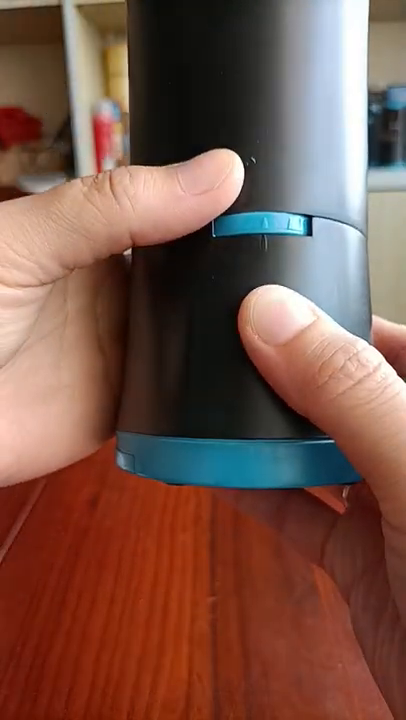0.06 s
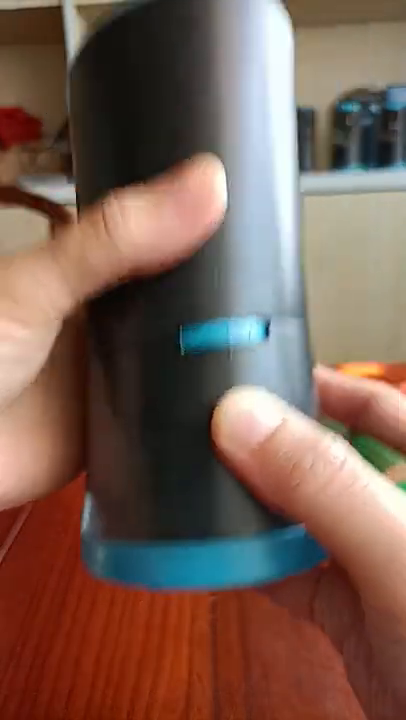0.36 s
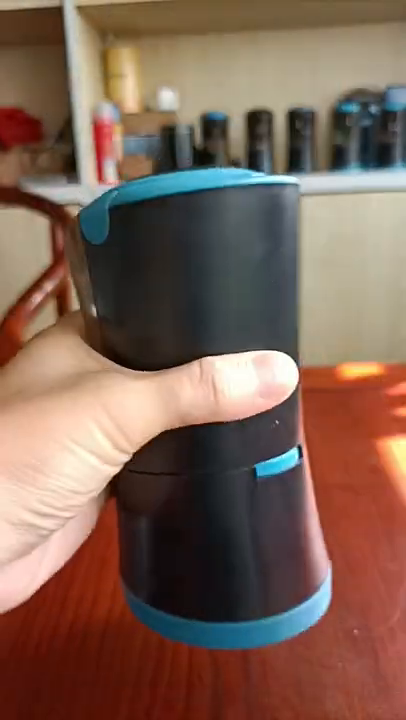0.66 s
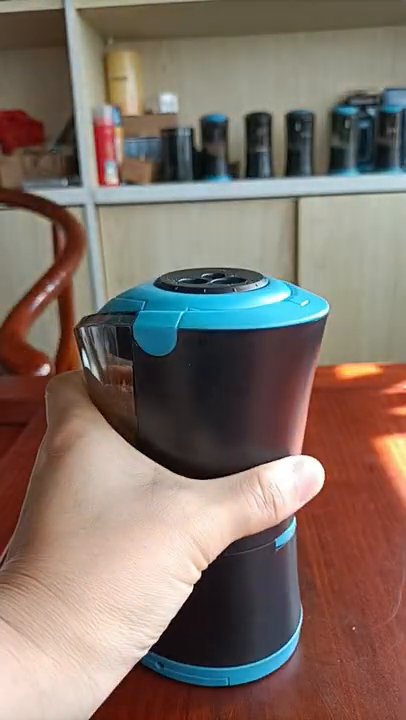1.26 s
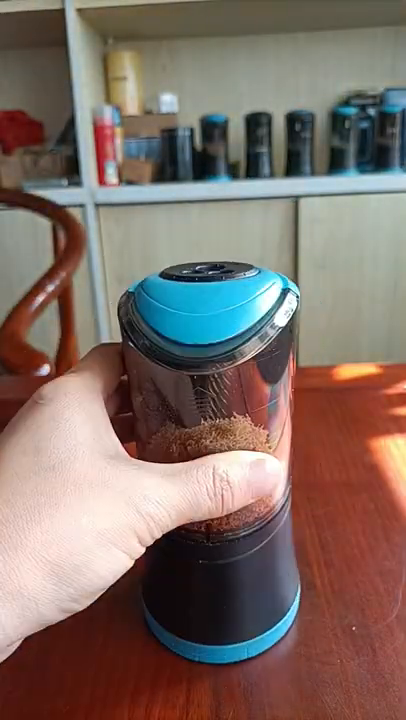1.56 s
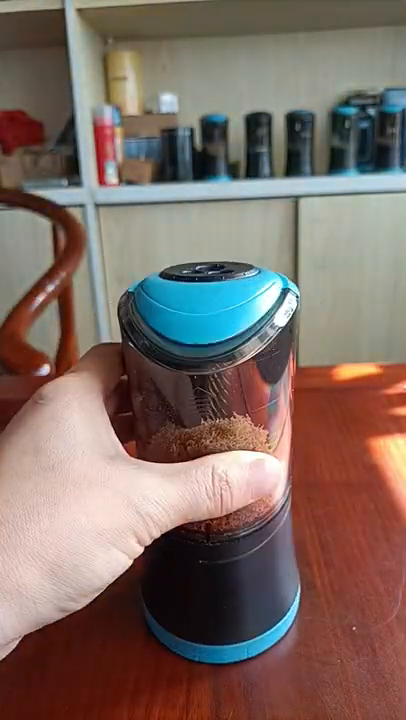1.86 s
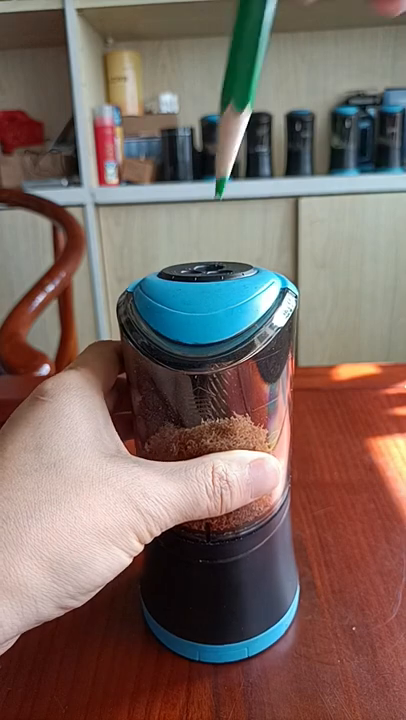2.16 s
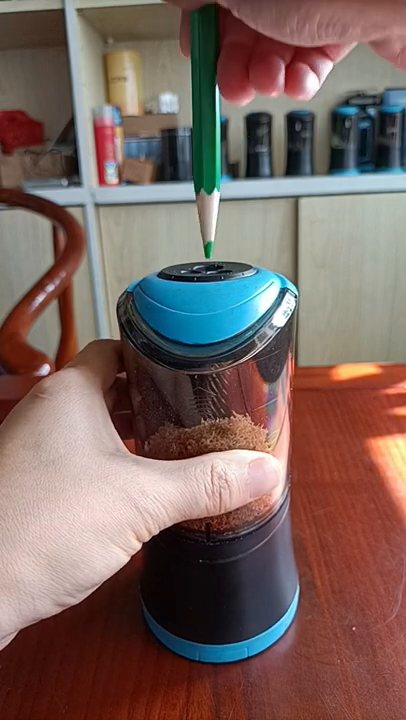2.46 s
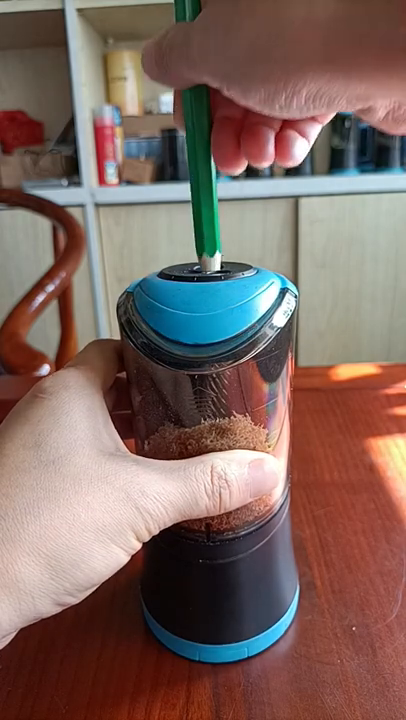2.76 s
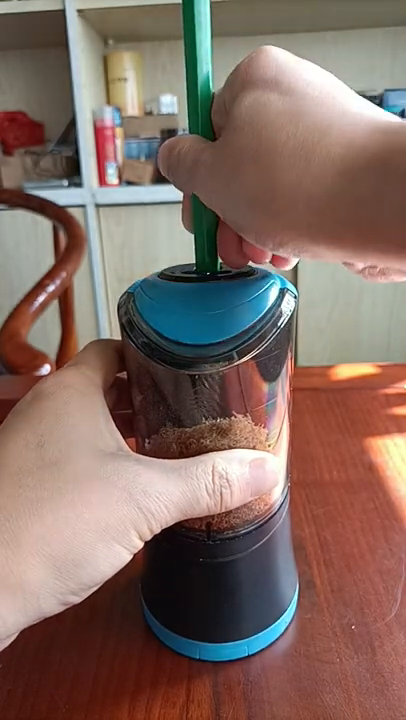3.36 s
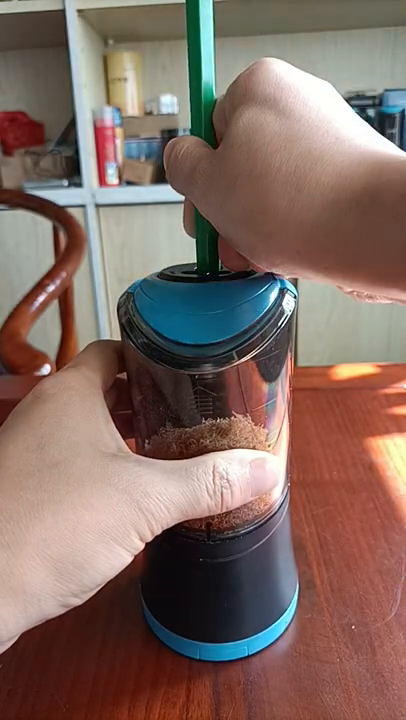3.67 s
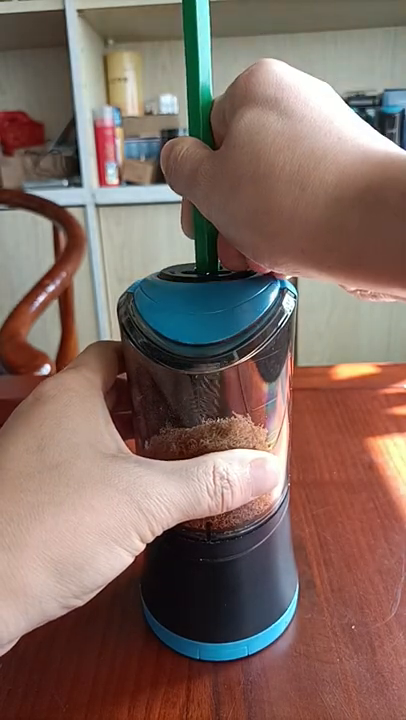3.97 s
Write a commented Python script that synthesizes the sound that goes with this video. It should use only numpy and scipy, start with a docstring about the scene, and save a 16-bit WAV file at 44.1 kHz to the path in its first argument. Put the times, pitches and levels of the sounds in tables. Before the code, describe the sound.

Close by in a small quiet room, faint handling of plastic leads to a thump on a wooden table and a soft pencil swish. Then the main sound: an electric pencil sharpener spins up, whining, rasping and crackling through wood.

```python
"""A quiet room with a wooden table: hands turn a battery pencil sharpener and stand it down with a thump.
A pencil swishes off the table, taps the lid and slides in. The motor spins up, its gears whine through
the plastic housing, and the speed sags and wavers as the cutter bites into the wood, scraping,
splintering and shaking the table top."""
import sys
import numpy as np
from scipy import signal
from scipy.fft import rfft, irfft
from scipy.io import wavfile
from scipy.ndimage import uniform_filter1d

SR = 44100
rng = np.random.default_rng(int(sys.argv[2]) if len(sys.argv) > 2 else 0)


def file_out(sig):
    """Save sig as 16-bit WAV at sys.argv[1]."""
    # one column per channel
    cols = np.atleast_2d(sig).T
    # limit, then scale
    lim = np.clip(cols, -1, 1)
    pcm = np.round(lim * 32767).astype(np.int16)
    wavfile.write(sys.argv[1], SR, pcm)


N = 176400
T = np.arange(N) / SR
FREQS = np.fft.rfftfreq(N, 1 / SR)

# gear-mesh rate, following the motor speed: time_s, rate_hz
MESH_RATE = [(3.07, 759.6), (3.08, 807), (3.098, 1069), (3.116, 1204), (3.138, 1286), (3.162, 1319),
             (3.204, 1187), (3.26, 1127), (3.322, 1022), (3.354, 1114), (3.374, 1208), (3.45, 900.4),
             (3.488, 825.4), (3.54, 854.6), (3.602, 800.4), (3.66, 787.5), (3.715, 877), (3.745, 817),
             (3.77, 731), (3.785, 716.2), (3.804, 764), (3.87, 874.4), (3.9, 842.5), (3.944, 748.2),
             (3.976, 803), (4.0, 744)]
# tone of wood scraping inside the sharpener: freq_hz, left_db, right_db
SCRAPE_EQ = [(100, -19, -28), (550, -1, -11), (990, -1, -0.5), (1770, 7, 1), (2220, 8, 7), (3000, 2, 4.5),
             (4380, 1.5, -4.5), (5970, -1.5, -0.5), (6400, 4, 0.5), (7170, 5, -9), (7680, -16, -0.5),
             (8200, -5, 8), (8560, -7, 1), (8920, -5.5, 5), (9640, -3, -4), (9960, 2.5, 6.5),
             (11150, -6.5, -3.5), (12740, -5.5, -9.5), (14600, -15, -47)]


def amp(db):
    """Decibels to gain."""
    return 10 ** (np.asarray(db) / 20)


def unit(x):
    """Scales to rms 1."""
    return x / np.sqrt(np.mean(x ** 2) + 1e-20)


def ear_gains(eq, hz):
    """Left and right gain of an EQ curve at hz."""
    freqs, left, right = np.transpose(eq)
    return amp([np.interp(np.log(hz + 1), np.log(freqs), db) for db in (left, right)])


def fader(table, column=1):
    """Gain over time from one dB column, silent outside its span."""
    rows = np.array(table)
    return amp(np.interp(T, rows[:, 0], rows[:, column], left=-np.inf, right=-np.inf))


def colour(x, eq):
    """Shapes a signal with each ear's EQ curve, at rms 1."""
    return unit(irfft(rfft(x) * ear_gains(eq, FREQS), N))


def noise(shared):
    """Stereo white noise with a fraction of its power common to both ears."""
    return np.sqrt(shared) * rng.standard_normal(N) + np.sqrt(1 - shared) * rng.standard_normal((2, N))


def drift(hz):
    """Random wavering up to about hz, at rms 1."""
    return unit(irfft(rfft(rng.standard_normal(N)) / (1 + (FREQS / hz) ** 4), N))


def decay(start, t60):
    """Sudden start, exponential fall."""
    return (T >= start) * np.exp(-np.log(1000) * np.maximum(T - start, 0) / t60)


def ring(x, modes):
    """Plays x through a set of dying modes."""
    t = T[:SR // 3]
    response = sum(amp(db - 60 * t / t60) * np.sin(2 * np.pi * hz * t) for hz, db, t60 in modes)
    return signal.oaconvolve(x, response)[:N]


def echoes(x, t60, per_s=2000):
    """A short tail of sparse reflections, different for each ear."""
    size = SR // 2
    taps = rng.choice([-1., 1.], (2, size)) * (rng.random((2, size)) < per_s / SR)
    taps *= decay(.002, t60)[:size]
    return signal.fftconvolve(x, taps / np.linalg.norm(taps, axis=1, keepdims=True), axes=1)[:, :N]


def gears(teeth=9, jitter=0.006, rough_hz=170):
    """Rough harmonics of the tooth rate flare as they glide through the housing's resonances."""
    # how the housing radiates the whine: freq_hz, left_db, right_db
    housing_eq = [(720, -27, -33), (830, -26, -30), (900, -27, -32), (1100, -42, -39), (1300, -35, -33),
                  (1490, -38, -47), (1590, -21, -34), (1740, -18, -30), (1810, -28, -38), (2050, -18, -25),
                  (2200, -12, -20), (2330, -12, -20), (2410, -18, -25), (2510, -26, -29), (2620, -25, -24),
                  (2830, -27, -15), (3000, -30, -31), (3080, -26, -29), (3200, -35, -40), (3330, -29, -35),
                  (3470, -42, -46), (3720, -24, -30), (3950, -33, -38), (4130, -34, -38), (4400, -44, -47),
                  (4700, -30, -36), (5100, -33, -37), (5600, -36, -40), (6800, -36, -46), (7500, -50, -50),
                  (8200, -50, -34), (9500, -46, -41), (11000, -43, -45)]
    # gear harmonics: multiple, level_db
    harmonics = [(1, 0.5), (2, 1.85), (3, 3), (4, -1), (5, -5.5), (6, -1.5), (7, -4)]
    # swell of the whine: time_s, level_db
    swell = [(3.052, -22), (3.085, -2), (3.14, 1.5), (3.19, 1.5), (3.26, 1), (3.39, 2.5), (3.43, 1),
             (3.52, -0.5), (3.64, 0), (3.72, 2), (3.785, -3), (3.86, 2), (4.0, 0)]
    # phase between the ears: freq_hz, left_lead_rad
    ear_phase = [(700, -0.9), (1650, -1.88), (2150, -2.5), (2350, -3), (2580, -5), (3100, -4.5),
                 (3880, -6.5), (7000, -13.5)]
    hz = np.interp(T, *np.transpose(MESH_RATE))
    phase = 2 * np.pi * np.cumsum(hz * (1 + jitter * drift(rough_hz))) / SR
    whine = np.zeros((2, N))
    for k, db in harmonics:
        shaft_wobble = 0.2 * np.sin(phase / teeth + k)
        contact = 1 + 0.2 * drift(rough_hz) + shaft_wobble
        if k == 1:
            contact += 0.53 * drift(35.7)  # the fundamental flutters
        smear = 0.016 * k ** 2 * drift(rough_hz)  # upper harmonics blur most
        ears = np.outer([0, -1], np.interp(k * hz, *np.transpose(ear_phase)))
        tone = np.sin(k * phase + ears + smear + 2 * np.pi * rng.random())
        whine += amp(db) * ear_gains(housing_eq, k * hz) * contact * tone
    return amp(-1.7) * np.sqrt(2) * whine * fader(swell)


def wood_grain(teeth_passed, chips_per_s=1300):
    """Hiss and tiny chips of cut wood echo in the case and rasp in time with the gear teeth."""
    chips = (rng.random(N) < chips_per_s / SR) * rng.choice([-1, 1], N)
    chips = chips * amp(-np.minimum(rng.exponential(1, N), 4))
    grain = unit(noise(shared=0.21) + amp(-6) * unit(chips))
    grain += amp(-3) * echoes(grain, t60=0.043)
    rasp = 1 + 0.22 * np.cos(2 * np.pi * teeth_passed)
    return grain * rasp * amp(1.1 * drift(220))


def cutter(teeth_per_blade=18):
    """Blades scrape the wood and catch now and then; their steady strikes shake the table."""
    # bite of the blades: time_s, scrape_db, rumble_db
    bite = [(3.055, -32, -46), (3.063, -38, -42), (3.074, -31, -37.5), (3.103, -25.5, -31),
            (3.16, -20.5, -29), (3.177, -24.5, -32.5), (3.345, -27, -30), (3.367, -25, -29.5),
            (3.507, -30.5, -33), (3.519, -28.5, -28.5), (3.659, -31, -35.5), (3.677, -28.5, -30.5),
            (3.803, -32, -33.5), (3.867, -28.5, -26.5), (3.887, -30, -36.5), (4.0, -30, -33.5)]
    # modes of the table top: pitch_hz, level_db, t60_s
    table_modes = [(195, -3.5, 0.12), (291, 3.5, 0.12)]
    # low rumble of the cut: freq_hz, left_db, right_db
    rumble_eq = [(20, -45, -45), (45, -40, -43), (102, -15, -18), (200, -1, -8), (291, 2, 0.5),
                 (433, -9, -12.5), (646, -15.5, -15.5), (2000, -61, -57), (16000, -90, -90)]
    teeth_passed = np.cumsum(np.interp(T, *np.transpose(MESH_RATE))) / SR
    grain = wood_grain(teeth_passed)
    scrape = amp(5.5) * fader(bite) * colour(grain, SCRAPE_EQ)
    strikes = np.diff(np.floor(teeth_passed / teeth_per_blade), prepend=0) * amp(2.5 * drift(150))
    shake = amp(-9.5) * unit(ring(strikes, table_modes)) * amp([[2], [-1.5]])
    rumble = amp(-0.5) * colour(noise(shared=0.96), rumble_eq)
    return scrape + fader(bite, column=2) * (shake + rumble) + catches(grain)


def catches(grain, split_delay_s=0.0012):
    """A blade snags with a knock, and the wood splinters just after."""
    # snags of the cutter: start_s, knock_db, splinter_db
    snags = [(3.053, -29, -40), (3.072, -31, -37), (3.133, -13.5, -15), (3.158, -31, -14.5),
             (3.206, -36, -27), (3.358, -23.5, -20), (3.438, -18.5, -34), (3.678, -23, -47)]
    # body of the knock: freq_hz, left_db, right_db
    knock_eq = [(20, -37, -40), (70, -23, -19), (250, 3, -3), (563, 4.5, -9), (905, 14, 10.5),
                (1490, 4, -11), (3000, -7, -8), (11000, -22, -11), (15000, -30, -40)]
    # bright crack of splitting wood: freq_hz, left_db, right_db
    splinter_eq = [(2000, -31, -36), (6500, -15, -16), (8000, -8, 16), (10400, -6, -2), (14800, -16, -26)]
    knocks = sum(amp(db) * decay(start, t60=0.03) for start, db, _ in snags)
    splinters = sum(amp(db) * decay(start + split_delay_s, t60=0.044) for start, _, db in snags)
    return knocks * colour(noise(shared=0.8), knock_eq) + splinters * colour(grain, splinter_eq)


def thumps(rise_s=0.00414, overtone_ratio=1.64):
    """The table top rings low and briefly under the base, with one overtone."""
    # the base meets the table: start_s, level_db, pitch_hz, t60_s
    landings = [(0.663, -34.5, 66, 0.18), (1.313, -18.5, 167.7, 0.068), (1.351, -33, 175, 0.07),
                (1.4831, -6.5, 200, 0.061), (1.4949, -4, 187.6, 0.038), (1.511, -13, 220, 0.047),
                (3.162, -15, 178, 0.072), (3.198, -16.5, 195, 0.12), (3.53, -17.5, 238, 0.03),
                (3.676, -10, 200, 0.025)]
    wood = np.zeros(N)
    for start, db, hz, t60 in landings:
        age = np.maximum(T - start, 0)
        phase = 2 * np.pi * hz * age
        tone = np.sin(phase) + amp(-17.5) * np.sin(overtone_ratio * phase)
        wood -= amp(db) * np.minimum(age / rise_s, 1) * decay(start, t60) * tone
    return wood * amp([[2], [-1.5]])  # left of centre


def contacts():
    """Each touch is a short burst; the stiff shell rings only faintly after it."""
    # light plastic and pencil touches: start_s, level_db, t60_s, pan_left_db
    ticks = [(0.444, -49.5, 0.1, -3), (0.511, -54, 0.053, 10), (0.6635, -39, 0.042, 1),
             (1.322, -60, 0.061, 2), (1.487, -25.5, 0.017, -7), (1.496, -39.5, 0.098, -6),
             (1.853, -52, 0.23, -3), (2.123, -43.5, 0.02, -9), (2.864, -54, 0.15, -3),
             (3.0547, -23.5, 0.023, 0)]
    # tone of a touch: freq_hz, left_db, right_db
    tick_eq = [(100, -18, -19), (815, 11, 7), (2750, 12, 0), (5330, 2.5, -3), (6500, 11, -26),
               (7700, -2, 0), (10200, -9, 0.5), (12400, -5, -15), (16000, -15, -31)]
    # modes of the plastic shell: pitch_hz, level_db, t60_s
    shell_modes = [(2570, 1, 0.091), (2943, -2, 0.15), (5130, -22, 0.083), (6200, -12, .11),
                   (7900, -6, 0.11)]
    bursts, hits = np.zeros((2, N)), np.zeros(N)
    for start, db, t60, pan in ticks:
        bursts += amp([[db + pan / 2], [db - pan / 2]]) * decay(start, t60)
        hits[round(start * SR)] = amp(min(db, -42))
    return bursts * colour(noise(shared=0.26), tick_eq) + amp(-6) * ring(hits, shell_modes)


def lid_tap(start_s=2.864):
    """The pencil point meets the rim of the opening and the thin lid rings."""
    # modes of the lid: pitch_hz, level_db, t60_s
    lid_modes = [(2433, -2, .24), (3144, -3, .15), (5211, -6, .15), (6040, -8, .15)]
    hit = np.zeros(N)
    hit[round(start_s * SR)] = 1
    return np.outer(amp([-49, -53]), ring(hit, lid_modes))


def hand_grip():
    """Skin slides on the shell with a flickering hiss over a low rub."""
    # movement of the hand: time_s, hiss_db, rub_db
    grip = [(0.3, -93, -47), (0.34, -74, -53), (0.394, -54.5, -44), (0.432, -50, -47.5), (0.486, -58, -50),
            (0.536, -48.5, -49.5), (0.585, -52, -53), (0.634, -57, -57), (0.662, -52, -48),
            (0.71, -59, -44), (0.82, -66.5, -61.5), (1.0, -76, -51.5)]
    # hiss of skin on plastic: freq_hz, left_db, right_db
    skin_eq = [(200, -15, -4), (1490, -6, -3.5), (4970, -9, -7.5), (6980, 8.5, -6), (7900, -12, 2.5),
               (9900, 0, -2.5), (12500, -4.5, -7), (15200, 6, -21)]
    # low rub of the hand: freq_hz, left_db, right_db
    rub_eq = [(20, -31, -31), (55.7, -3, -4), (86, -29, -30), (300, -27.5, -28), (1000, -64, -63)]
    hiss = amp(5 + drift(80)) * fader(grip) * colour(noise(shared=0.17), skin_eq)
    rub = amp(2) * fader(grip, column=2) * colour(noise(shared=1), rub_eq)
    return hiss + rub


def pencil_slide(width_hz=610):
    """The pencil swishes over the table with a falling resonance and rings as it leaves the wood."""
    # the stroke: time_s, swish_db, resonance_db, resonance_hz
    stroke = [(1.65, -83, -84, 4600), (1.8, -66, -81.5, 4680), (1.88, -57.5, -58.5, 4690),
              (2.0, -57, -55, 4550), (2.07, -54, -56, 3930), (2.12, -63, -79, 3500),
              (2.199, -62.5, -83, 3000), (2.36, -80, -88, 3000)]
    # friction of pencil on table: freq_hz, left_db, right_db
    swish_eq = [(300, -7, -11), (2000, -1, 0), (2750, 5, 5), (3560, -1, -5), (5500, -4, -6),
                (6200, 9.5, -6), (6840, 11.5, -2), (7650, -11, -9), (8140, -19, 3), (9200, -9, -7),
                (12500, -8, -8), (15300, -3, -21)]
    # swell of the parting ring: time_s, level_db
    lift_off = [(2.03, -78), (2.07, -43.5), (2.12, -52), (2.18, -85)]
    # mode of the pencil: pitch_hz, level_db, t60_s
    pencil_modes = [(2830, 0, 0.045)]
    times, _, _, hz = np.transpose(stroke)
    carrier = np.exp(2j * np.pi * np.cumsum(np.interp(T, times, hz)) / SR)
    band = np.array([drift(width_hz / 2) + 1j * drift(width_hz / 2) for ear in "LR"])
    resonance = fader(stroke, column=2) * unit((band * carrier).real)
    chirp = fader(lift_off) * unit(ring(rng.standard_normal(N), pencil_modes))
    swish = fader(stroke) * colour(noise(shared=0.33), swish_eq)
    return swish + resonance + chirp


def pencil_feed():
    """The pencil scrapes softly down the guide hole."""
    # friction of the push: time_s, level_db
    push = [(2.88, -60), (2.95, -73), (3.01, -62), (3.05, -51.5)]
    return fader(push) * colour(noise(shared=0.23), SCRAPE_EQ)


def room_tone():
    """A faint, low bed of still air."""
    # tone of the room: freq_hz, left_db, right_db
    air_eq = [(20, 1.5, 0), (49, -1.5, -0.5), (91, -7.5, -8), (260, -5.5, -6), (406, -11.5, -14.5),
              (660, -20, -25), (1380, -24.5, -26.5), (2510, -28.5, -32.5), (4280, -37, -40),
              (7160, -38.5, -51.5), (8100, -51.5, -39.5), (10200, -44.5, -44), (16000, -37, -46)]
    return amp(-52) * colour(noise(shared=0.75), air_eq)


def scene(left_lag_s=0.00021):
    """The sharpener stands close by in a small room; its sound reaches the right ear first."""
    close = cutter() + contacts() + hand_grip() + pencil_slide() + pencil_feed()
    close[0] = np.interp(T - round(left_lag_s * SR) / SR, T, close[0])
    close += gears() + lid_tap()
    return close + amp(-13) * echoes(close, t60=0.51) + thumps() + room_tone()


def record(dry, ceiling=0.92, knee=6, dip_db=-31, cutoff_hz=15650):
    """Peaks are rounded off, the level dips briefly after the loud thump, and the top treble is cut."""
    soft = dry / (1 + np.abs(dry / ceiling) ** knee) ** (1 / knee)
    dip = uniform_filter1d(1. * ((T > 1.529) & (T < 1.556)), size=60)
    lowpass = signal.firwin(511, cutoff_hz, window=("kaiser", 9), fs=SR)
    return signal.oaconvolve(soft * amp(dip_db * dip), lowpass[None], "same")


dry = scene()
out = record(dry)
file_out(out)
```